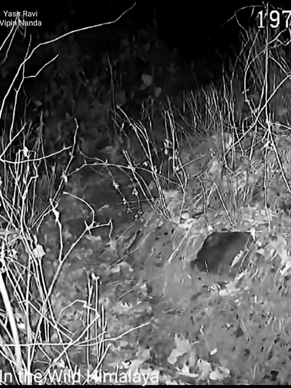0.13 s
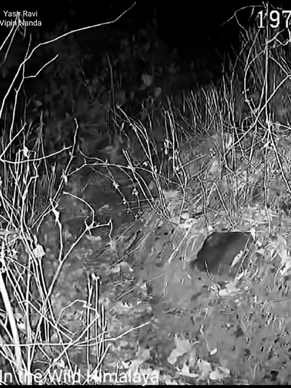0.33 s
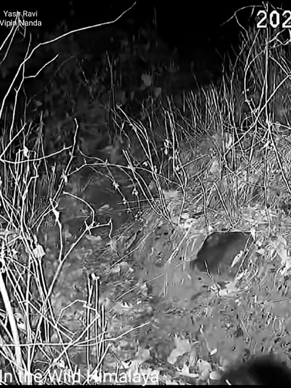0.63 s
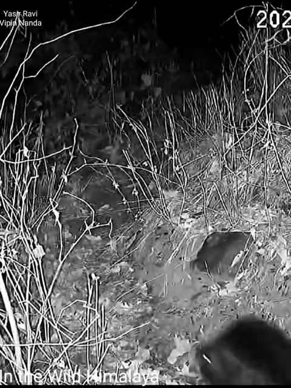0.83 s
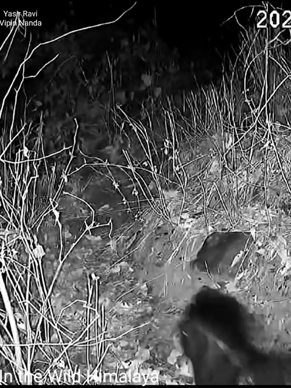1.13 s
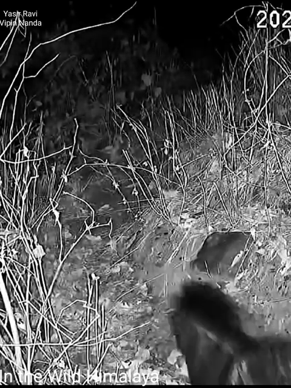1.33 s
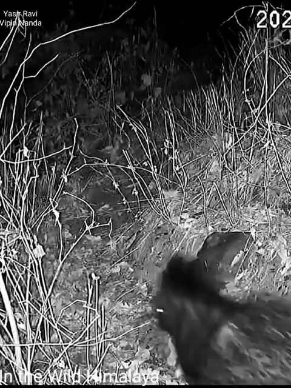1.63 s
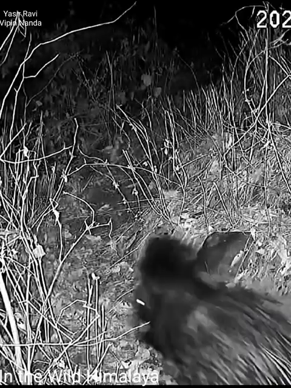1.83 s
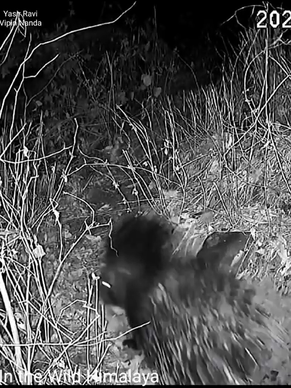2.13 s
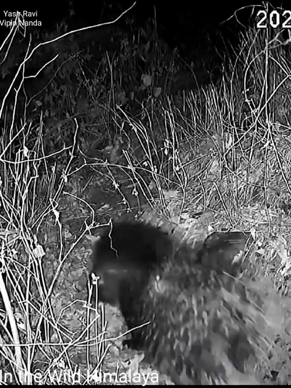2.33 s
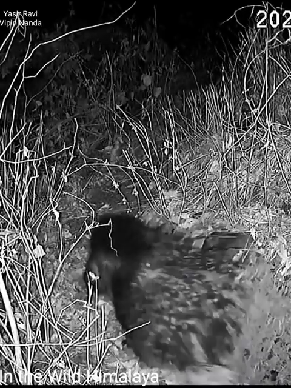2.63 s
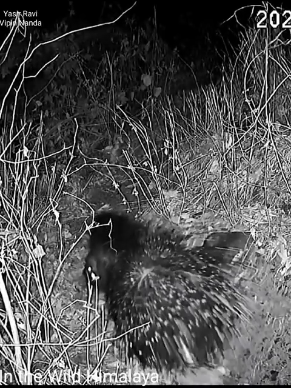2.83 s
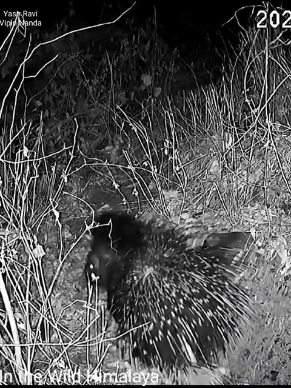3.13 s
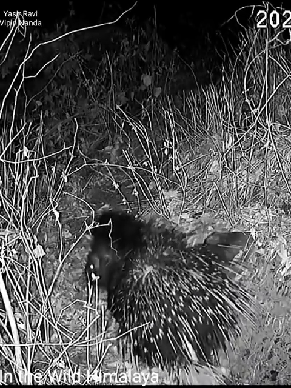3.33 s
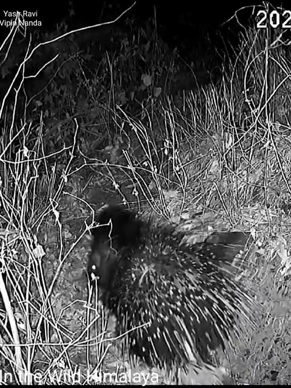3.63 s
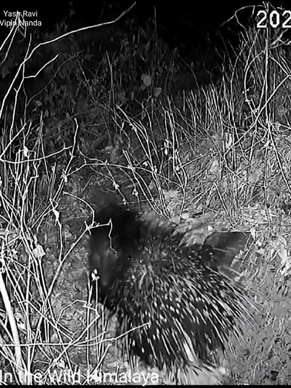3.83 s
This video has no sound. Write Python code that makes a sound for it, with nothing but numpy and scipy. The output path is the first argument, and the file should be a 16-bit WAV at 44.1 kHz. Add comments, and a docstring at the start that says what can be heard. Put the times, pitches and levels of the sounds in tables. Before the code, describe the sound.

Crickets trill in overlapping turns at night over a distant chorus and faint hiss.

```python
"""Night on a wooded slope, with a far cricket chorus, a low rumble of air and hiss throughout.
A slow cricket starts to trill, each wing stroke a tone that sags as the wings close; a higher one joins.
From about 1 s others answer with fast runs of falling sweeps, and a small animal chatters faintly.
Near 2 s a close cricket sings, then a faint thin one; the runs and the chatter return, and a far cricket
has the last turn. The undergrowth scatters every stroke into a short echo."""
import sys
import numpy as np
from scipy import signal
from scipy.fft import rfft, irfft, next_fast_len
from scipy.io import wavfile
from scipy.ndimage import map_coordinates

SR = 44100
rng = np.random.default_rng(int(sys.argv[2]) if len(sys.argv) > 2 else 0)


def bounce(signal):
    """Save signal as a 16-bit WAV file at the path given by the first command-line argument."""
    frames = np.transpose(np.atleast_2d(signal))
    limited = np.clip(frames, -1, 1)
    pcm = np.round(limited * 32767).astype(np.int16)
    wavfile.write(sys.argv[1], SR, pcm)


N = 176400


# One wing stroke. Each row: seconds from its loud middle, pitch in Hz, level in dB.
NEAR_SHAPE = [(-.022, 4300, -22), (-.015, 4335, -4.7), (-.007, 4362, -2.9), (.002, 4335, 0),
              (.008, 4302, -1), (.012, 4190, -8), (.018, 3940, -23)]
# The trill. Each row: time in seconds, level in dB, length as a multiple of the usual, pitch shift in Hz.
NEAR_TRILL = [(1.941, -37, 0.95, -15), (1.982, -26, 0.85, -12), (2.029, -26, 0.99, -3),
              (2.078, -26, 0.99, 8), (2.127, -26, 0.99, 5), (2.177, -25.5, 0.98, -4),
              (2.225, -25, 0.91, -4), (2.277, -25, 0.92, 3), (2.324, -25, 1, 5), (2.375, -24.5, 0.98, 5),
              (2.425, -25, 0.95, -3), (2.476, -25.5, 1, 0)]

def near_cricket():
    """The closest, loudest cricket rubs its wings about twenty times a second."""
    return cricket(NEAR_SHAPE, NEAR_TRILL, pan_db=-2, overtones_db=(-21, -34.5), echo_db=-15.5)


# One wing stroke. Each row: seconds from its loud middle, pitch in Hz, level in dB.
HIGH_SHAPE = [(-.024, 4380, -20), (-.015, 4538, -10.5), (-.008, 4594, -3), (-.002, 4585, -2.5),
              (.005, 4510, -1.5), (.012, 4327, -6.5), (.018, 3950, -25)]
# The trill. Each row: time in seconds, level in dB, length as a multiple of the usual, pitch shift in Hz.
HIGH_TRILL = [(.589, -43, .7, -160), (0.699, -36.5, .7, -170), (.785, -39, .8, -170),
              (0.894, -34, .8, -190), (0.988, -31.5, 0.81, -46), (1.044, -29.5, 0.97, -11),
              (1.101, -27, 1, 15), (1.158, -25.5, 0.81, -5), (1.214, -27, 0.97, -11),
              (1.274, -26, 0.75, -18), (1.335, -25.5, 0.9, 12), (1.391, -26.5, 0.91, 6),
              (1.451, -27, 1, -2), (1.511, -27, 1, -4), (1.572, -27, 1, -10), (1.638, -27, 1, -24)]

def high_cricket():
    """A higher cricket starts softly, then strokes faster and louder."""
    return cricket(HIGH_SHAPE, HIGH_TRILL, pan_db=.8, overtones_db=(-28.5, -38), echo_db=-11.5)


# One wing stroke. Each row: seconds from its loud middle, pitch in Hz, level in dB.
SLOW_SHAPE = [(-.042, 4200, -25), (-.028, 4145, -11), (-.014, 4110, -4), (.002, 4097, 0), (.008, 4060, -2),
              (.013, 3930, -7.5), (.019, 3720, -22)]

def slow_cricket(count, start_s=.208, period_s=.0947, start_db=-32.5, grow_db_per_s=1):
    """Evenly spaced wing strokes that grow a little louder."""
    strokes = [(start_s + t, start_db + grow_db_per_s * t) for t in period_s * np.arange(count)]
    return cricket(SLOW_SHAPE, strokes, pan_db=5, overtones_db=(-25.5, -28.5), echo_db=-8)


# One wing stroke. Each row: seconds from its loud middle, pitch in Hz, level in dB.
FAR_SHAPE = [(-.036, 4290, -14), (-.023, 4264, -4.5), (-.008, 4250, -2), (.002, 4246, 0),
             (.008, 4210, -1.5), (.013, 4095, -8), (.019, 3900, -21)]
# The trill. Each row: time in seconds, level in dB.
FAR_TRILL = [(1.768, -46), (1.860, -40), (3.071, -51), (3.169, -44), (3.261, -45), (3.352, -45),
             (3.446, -42), (3.537, -40.5), (3.629, -41.5), (3.717, -40), (3.807, -42), (3.899, -39.5),
             (3.991, -39.5)]

def far_cricket():
    """A far cricket gives two strokes, waits, then trills to the end."""
    return cricket(FAR_SHAPE, FAR_TRILL, pan_db=-1.5, overtones_db=(-26.5, -35), echo_db=-22.5)


# One wing stroke. Each row: seconds from its loud middle, pitch in Hz, level in dB.
THIN_SHAPE = [(-.007, 5230, -14), (-.003, 5070, -1), (.002, 5020, 0), (.008, 4840, -13)]
# The trill. Each row: time in seconds, level in dB.
THIN_TRILL = [(2.339, -52), (2.384, -57), (2.442, -51.5), (2.490, -52), (2.545, -55), (2.597, -52),
              (2.653, -52), (2.706, -52), (2.758, -54), (2.814, -52), (2.869, -55), (2.926, -54)]

def thin_cricket():
    """Faint, short, very high strokes with an echo almost as strong as they are."""
    return cricket(THIN_SHAPE, THIN_TRILL, pan_db=-2, overtones_db=(-40, -43), echo_db=-.5)


# One fast wing stroke. Each row: seconds from its middle, pitch in Hz, level in dB.
SWEEP_SHAPE = [(-.016, 4500, -24), (-.0125, 4390, -1), (-.006, 4170, -1.5), (0, 3900, 0),
               (.004, 3710, -2.5), (.01, 3400, -18)]
# The runs. Each row: first and last stroke in seconds, level in dB, pitch shift in Hz,
# left over right in dB, stroke length as a multiple of the usual.
SWEEP_RUNS = [(0.975, 1.34, -42, -8, 1, 0.92), (1.2, 1.606, -44, 0, 21, .95),
              (2.567, 2.989, -41.5, 1, 1.5, 0.93), (3.116, 3.463, -41.5, 100, 15, 0.85)]

def sweep_runs(period_s=.0285, swell_s=.14, swell_db=6, late_s=.012, grit_db=2.5, scatter_s=.0008):
    """Fast falling sweeps, gritty as the wing's file bites unevenly; the wings open wider as a run starts."""
    out = np.zeros((2, N))
    for first, last, db, shift_hz, pan_db, length in SWEEP_RUNS:
        times = np.linspace(first, last, round((last - first) / period_s) + 1)
        shyness = np.clip(1 - (times - first) / swell_s, 0, 1)  # early strokes are softer and shorter
        times += scatter_s * rng.standard_normal(len(times))
        strokes = [(s, db - swell_db * shy, length, shift_hz, late_s * np.sqrt(shy), grit_db)
                   for s, shy in zip(times, shyness)]
        out += cricket(SWEEP_SHAPE, strokes, pan_db, overtones_db=(-34, -25.5), echo_db=-6.5)
    return out


def cricket(shape, strokes, pan_db, overtones_db, echo_db):
    """One insect plays its strokes from one perch, each followed by its echo."""
    out = np.zeros((2, N))
    for row in strokes:
        start_s, tone = wing_stroke(shape, overtones_db, *row)
        sound = amp(echo_db) * undergrowth(tone)
        sound[:, :len(tone)] += tone
        add(out, start_s, panned(sound, pan_db))
    return out


def wing_stroke(shape, overtones_db, s, db, length=1, shift_hz=0, silent_s=0, flutter_db=.92):
    """One closing of the wings: a gliding tone with two overtones. Returns its start time and sound."""
    stray_hz, waver_hz, overtone_flutter_db, blur_radians = 4, 8.3, 4, .7
    when, hz, level = np.transpose(shape)
    size = SR // 10
    t = when[0] + np.arange(size) / SR / length
    pitch = np.interp(t, when, hz) + shift_hz
    pitch += stray_hz * rng.standard_normal() + waver_hz * wobble(314, size)
    fade_in = np.clip((t - when[0] - silent_s) / .0034, 0, 1)
    fade_out = np.clip((when[-1] - t) / .0043 + 1, 0, 1)
    force = fade_in * fade_out * amp(np.interp(t, when, level) + flutter_db * wobble(359, size))
    phase = 2 * np.pi * np.cumsum(pitch) / SR
    tone = np.sin(phase)
    for multiple, overtone_db in enumerate(overtones_db, 2):  # two and three times the pitch
        gain = amp(overtone_db + overtone_flutter_db * wobble(135, size))
        tone += gain * np.sin(multiple * phase + blur_radians * wobble(395, size))
    return s + when[0] * length, np.sqrt(2) * amp(db) * force * tone


# The rasps. Each row: time in seconds, level in dB.
SCRAPE_TIMES = [(.372, -53), (.457, -61), (1.148, -42.5), (1.337, -52), (1.452, -50), (1.638, -48)]
# Their tone colour. Each row: frequency in Hz, level in dB.
SCRAPE_SPECTRUM = [(2500, -40), (3800, 0), (4800, -1), (5600, -9), (7000, -16), (9000, -25), (15000, -36)]

def scrapes(width_s=.003):
    """Brief dry rasps where the wing's file, its row of tiny teeth, catches."""
    t = np.arange(N) / SR
    bursts = sum(amp(db) * bump(t - s, width_s) for s, db in SCRAPE_TIMES)
    return bursts * stereo_noise(SCRAPE_SPECTRUM, likeness=[(5000, .62)])


def undergrowth(x, stems_s=.045, slope_s=.33, stems_db=1.5):
    """Echo from near stems and the slope behind, different at each ear; each dies by 60 dB in its time."""
    t = np.arange(SR // 3) / SR
    fade = amp(-60 * t / slope_s) + amp(stems_db - 60 * t / stems_s)
    build_up = 1 - np.exp(-t / .0038)
    tail = rng.standard_normal((2, len(t))) * fade * build_up
    tail /= np.linalg.norm(tail, axis=1, keepdims=True)
    return signal.fftconvolve(x[None], tail, axes=1)


# The animal's calls. Each row: middle in seconds, level in dB, pitch in Hz.
CHATTER_CALLS = [(1.495, -56.5, 1437), (2.736, -48, 1470)]

def chatter(pulses_per_s=77, width_s=.029):
    """A small animal's brief, rapidly pulsed calls, off to the right."""
    t, out = np.arange(N) / SR, np.zeros(N)
    for s, db, hz in CHATTER_CALLS:
        pulses = .5 + .5 * np.cos(2 * np.pi * pulses_per_s * (t - s))
        pitch = hz + 50 * wobble(250, N)
        tone = np.sin(2 * np.pi * np.cumsum(pitch) / SR)
        out += amp(db + 3) * bump(t - s, width_s) * pulses * tone
    return panned(out, pan_db=-10)


# The blur of countless crickets. Each row: frequency in Hz, level in dB.
CHORUS_SPECTRUM = [(2900, -35), (3300, -16), (3600, -8.5), (3900, -5), (4150, -4.5), (4350, -4.5),
                   (4520, -10.5), (4700, -17.5), (5200, -53)]

def chorus(count, blur_db=-51.5, trill_db=-58, fade_db_per_s=.45):
    """Distant trills at their own rates and pitches over a blur of others, all slowly fading."""
    out = amp(blur_db + 1.6 * wobble(14, N)) * stereo_noise(CHORUS_SPECTRUM, likeness=[(4000, .41)])
    for offset, spacing, lowness, side in rng.random((count, 4)):
        times = np.arange(offset * .09, N / SR, .06 + .04 * spacing)
        strokes = [(s, trill_db, 1, 50 - 300 * lowness) for s in times]
        out += cricket(FAR_SHAPE, strokes, pan_db=8 * (side - .5), overtones_db=(-40, -40), echo_db=-3)
    return out * amp(-fade_db_per_s * (np.arange(N) - N / 2) / SR)


# Tone colour of the rumble and the hiss. Each row: frequency in Hz, level in dB.
RUMBLE_SPECTRUM = [(12, -41), (20, -14), (54, -1.5), (97, 0), (361, -8.5), (1050, -16.5), (1290, -17.5),
                   (1460, -18.5), (1830, -19.5), (2900, -23.5), (3770, -46), (6380, -120)]
HISS_SPECTRUM = [(2000, -29), (2900, 0.5), (6000, 0.5), (10000, -0.5), (15800, -2)]
# How alike each is at the two ears. Each row: frequency in Hz, likeness from 0 (unrelated) to 1 (same).
RUMBLE_LIKENESS = [(30, 0.59), (100, 0.23), (300, 0.018), (3000, .03)]
HISS_LIKENESS = [(3000, 0.046), (5500, 0.26), (7000, 0.86), (15000, 1)]

def night_air(rumble_db=-49, hiss_db=-56):
    """Low rumble of the open air and an even hiss."""
    rumble = amp(rumble_db + .38 * wobble(4.92, N)) * stereo_noise(RUMBLE_SPECTRUM, RUMBLE_LIKENESS)
    return rumble + amp(hiss_db) * stereo_noise(HISS_SPECTRUM, HISS_LIKENESS)


def stereo_noise(spectrum, likeness):
    """Noise of strength 1, made of a part both ears share and a part opposite in each."""
    def response(hz):
        angle = np.arccos(np.clip(along(likeness, hz), -1, 1)) / 2
        return amp(along(spectrum, hz)) * [np.cos(angle), np.sin(angle)]
    shared, opposite = filtered(rng.standard_normal((2, N)), response)
    return unit(np.array([shared + opposite, shared - opposite]))


def amp(db):
    """Turn decibels into a multiplier."""
    return 10 ** (np.asarray(db) / 20)


def unit(x):
    """Scale to an average strength (rms) of 1."""
    return x / np.sqrt(np.mean(x ** 2) + 1e-20)


def along(points, hz):
    """Read between (Hz, value) points, with octaves evenly spaced."""
    frequencies, values = np.transpose(points)
    return np.interp(np.log(hz + 1), np.log(frequencies + 1), values)


def bump(t, width_s):
    """A bell-shaped rise and fall around time zero."""
    return np.exp(-.5 * (t / width_s) ** 2)


def wobble(rate, size):
    """A smooth curve through `rate` random values a second."""
    return map_coordinates(rng.standard_normal(int(size * rate / SR) + 4), [np.arange(size) * rate / SR])


def filtered(x, response):
    """Scale each frequency in x by response(hz)."""
    size = next_fast_len(N + SR // 2)
    return irfft(rfft(x, size) * response(np.fft.rfftfreq(size, 1 / SR)), size)[..., :N]


def add(track, s, x):
    """Mix x into the stereo track at s seconds."""
    start = max(0, round(s * SR))
    part = track[:, start:start + x.shape[1]]
    part += x[:, :part.shape[1]]


def panned(x, pan_db):
    """Place a sound at equal power: positive pan_db is left, negative is right."""
    return unit(amp([[pan_db / 2], [-pan_db / 2]])) * x


def scene():
    """All the singers over the night air."""
    singers = slow_cricket(count=12) + high_cricket() + near_cricket() + far_cricket() + thin_cricket()
    return singers + sweep_runs() + scrapes() + chorus(count=3) + chatter() + night_air()


def record(dry, start_s=.086, top_hz=15850):
    """The sound opens after a moment of silence and holds nothing above top_hz."""
    opening = np.clip((np.arange(N) / SR - start_s) / .011, 0, 1)
    return filtered(dry * opening, lambda hz: hz < top_hz)


dry = scene()
out = record(dry)
bounce(out)
```